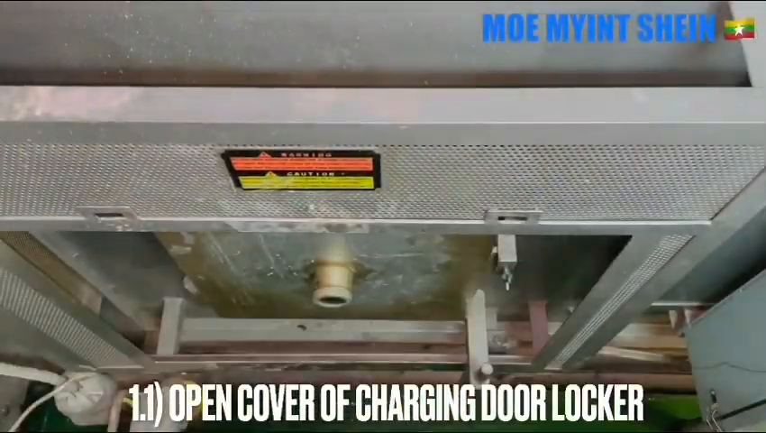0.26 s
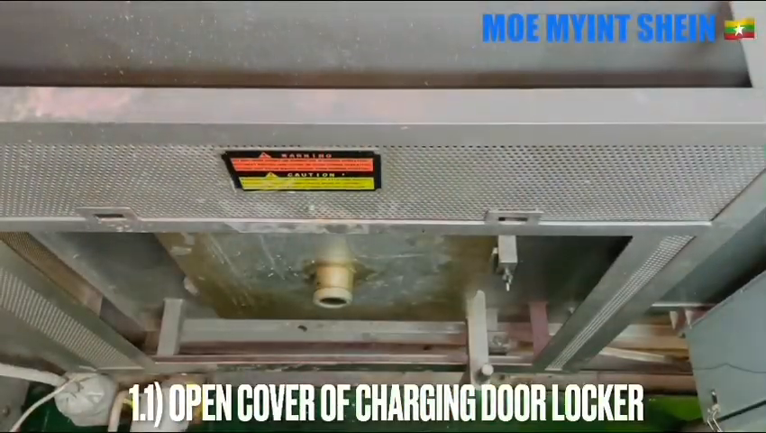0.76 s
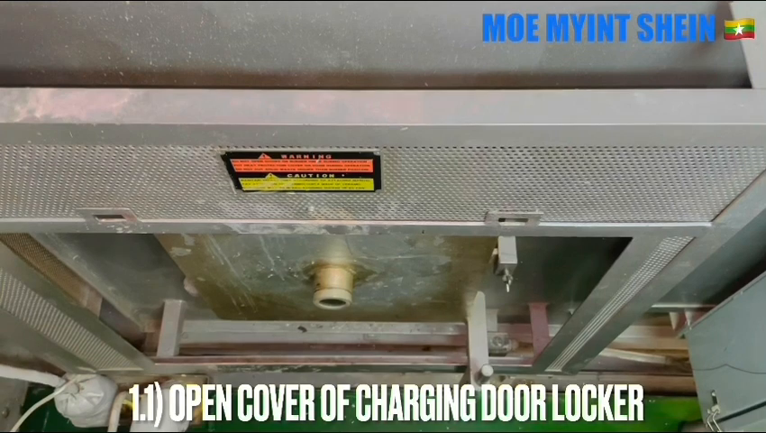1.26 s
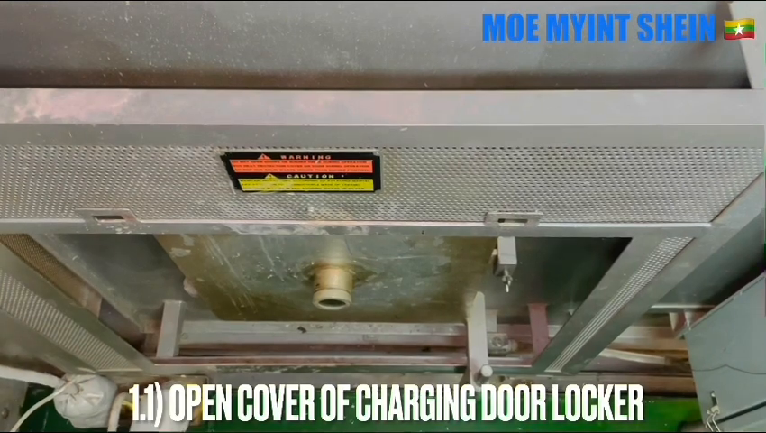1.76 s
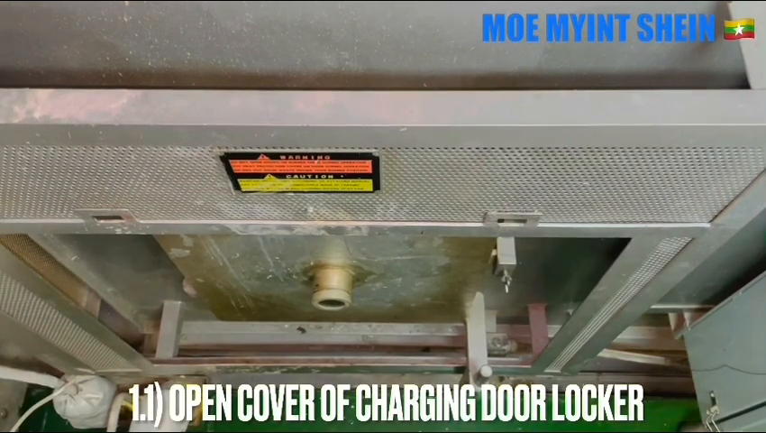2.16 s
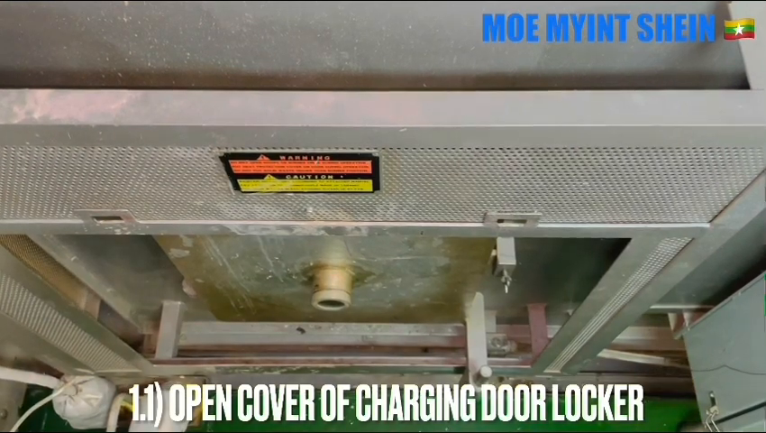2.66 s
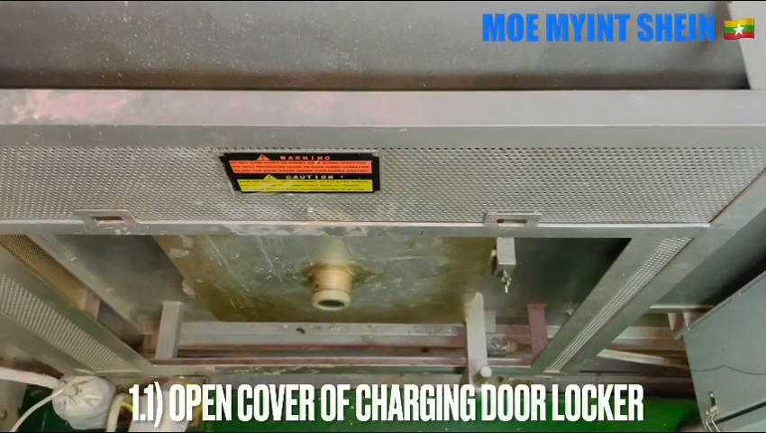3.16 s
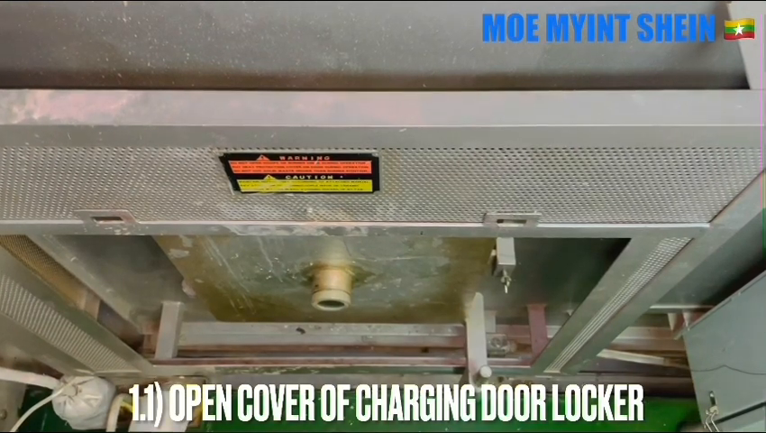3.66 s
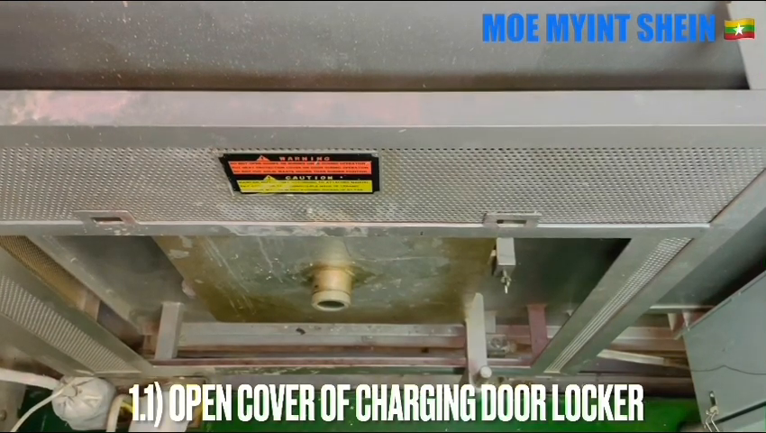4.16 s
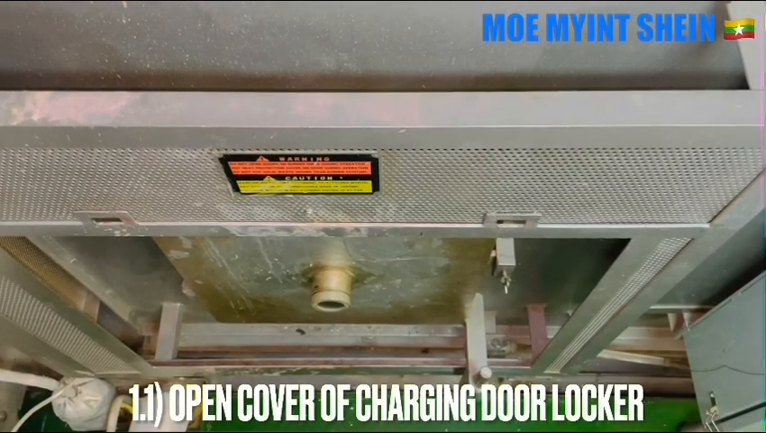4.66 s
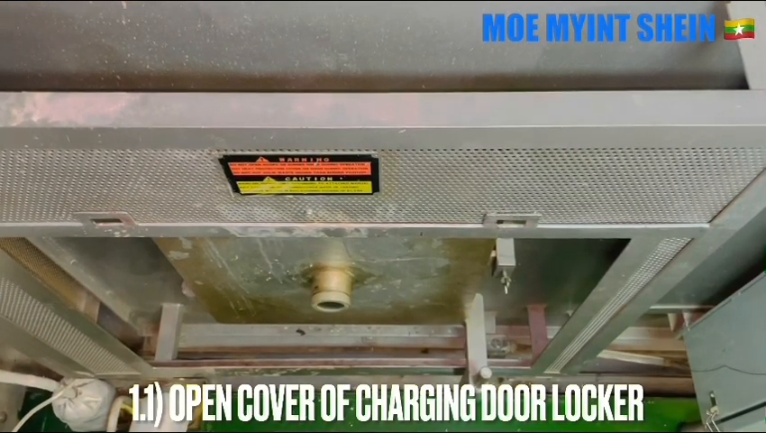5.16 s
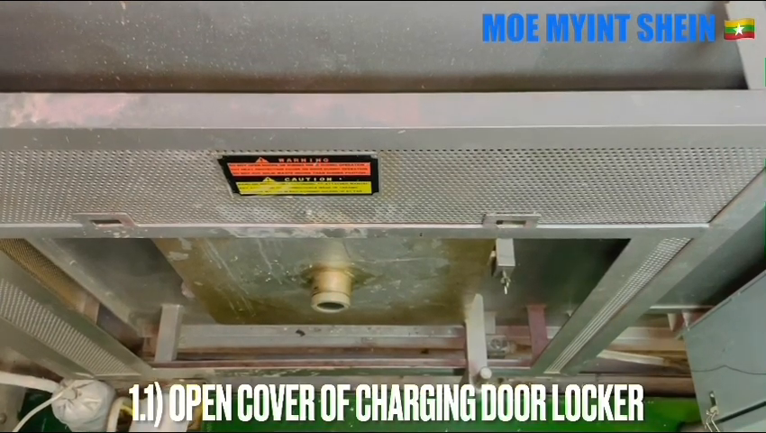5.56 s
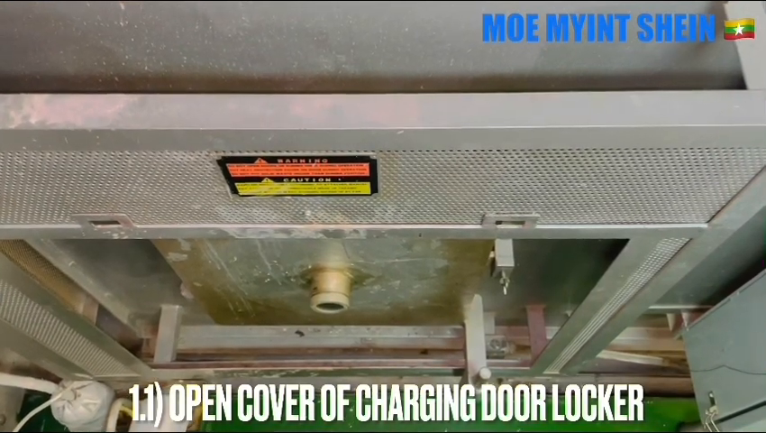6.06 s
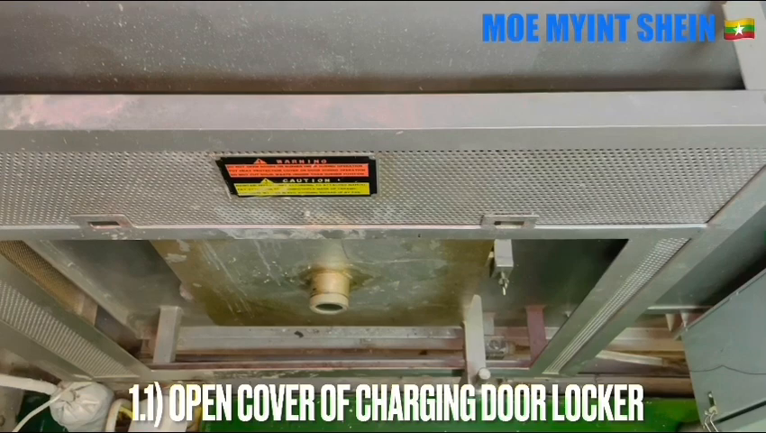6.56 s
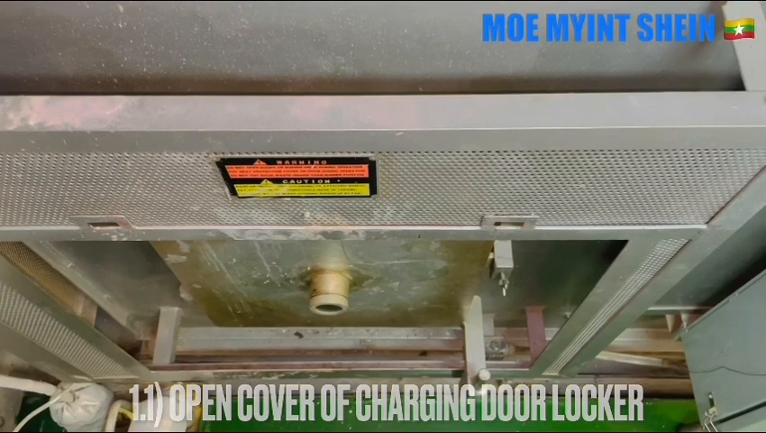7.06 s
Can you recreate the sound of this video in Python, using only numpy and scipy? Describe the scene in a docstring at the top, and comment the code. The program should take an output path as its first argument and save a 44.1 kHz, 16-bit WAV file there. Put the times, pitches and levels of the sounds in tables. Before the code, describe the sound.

A diesel generator throbs steadily in a ship's engine room, with a deep rumble from the deck plates. Other machines hum, pumps whine softly, fans rush and air hisses thinly. Near the start a small hard part ticks faintly and something scuffs briefly. Later come two faint, thin, high squeaks, the second right at the end. The sound is mono and the machinery never lets up.

```python
"""A diesel generator throbs in a ship's engine room: six cylinders, four-stroke, about 900 rpm.
Hull and deck plates rumble, other machines hum, pumps and gears whine, fans roar and beat, air hisses.
Faintly over this, a small hard part ticks, something scuffs by catching and slipping, and later come
two thin high squeaks: the first arcs up and down, the second rises at the very end. Mono."""
import sys
import numpy as np
from scipy.fft import rfft, irfft, next_fast_len
from scipy.io import wavfile
from scipy.ndimage import map_coordinates

SR = 44100
rng = np.random.default_rng(int(sys.argv[2]) if len(sys.argv) > 2 else 0)


def store_wav(level_fs):
    """Save 16-bit WAV to argv[1]."""
    pcm = np.round(np.clip(np.atleast_2d(level_fs), -1, 1) * 32767)
    wavfile.write(sys.argv[1], SR, pcm.T.astype(np.int16))


N = 322736

CYCLE_HZ = 7.517  # one four-stroke cycle, two crankshaft turns
FAN_SPLIT_HZ, TOP_HZ = 830, 15740

# Generator tones. Each row: multiple of the cycle rate (6 is the firing rate), relative level in dB.
GENERATOR_ORDERS = [(6, -40.9), (7, -50.0), (9, -54.1), (10, -44.2), (12, -46.3), (14, -40.4), (15, -51.4),
                    (18, -54.7), (21, -64.0), (25, -60.9), (48, -69.8), (64, -69.2)]
# Machine tones. Each row: frequency in Hz, relative level in dB.
MACHINE_HUMS = [(24.73, -54.4), (37.08, -48.2), (42.55, -52.6), (49.4, -53.0), (59.67, -48.0),
                (70.05, -52.7), (79.67, -52.4), (82.53, -52.1), (92.53, -53.2), (99.08, -46.3),
                (118.9, -54.1), (175.38, -57.2), (418.1, -67.8)]
PUMP_GEAR_WHINES = [(706.8, -79.1), (744.2, -78.9), (986.0, -68.3), (1057.5, -73.0), (1082.5, -81.8),
                    (1090.0, -74.2), (1232.8, -76.0), (1530.2, -80.5), (1546.5, -81.1), (1766.0, -79.0),
                    (1804.0, -83.9), (2412.0, -92.0), (2546.0, -89.0), (2662.5, -91.3), (2905.0, -84.6),
                    (3511.8, -94.0), (5470.5, -96.1), (7574.0, -101.0)]
FAN_BLADE_TONES = [(806.7, -78.5), (809.3, -76.0), (811.8, -73.5), (817.0, -83.0), (819.3, -83.0),
                   (824.0, -82.0), (850.8, -81.0), (852.0, -74.8)]
# Noise spectra. Each row: frequency in Hz, relative spectral density in dB.
PLATE_SPECTRUM = [(14, -36), (25, -16.5), (45, -2), (64, -9), (76, -6.5), (93, -3.5), (108, -16), (125, -9),
                  (161, -21), (175, -9.5), (187, -20), (199, -13), (210, -25), (260, -75)]
ROAR_SPECTRUM = [(150, -27), (205, -3.5), (235, 1), (335, 0.5), (400, -3), (425, -6), (445, -10),
                 (530, -12.5), (620, -22.5), (900, -39), (2000, -90)]
VENT_SPECTRUM = [(300, -19), (580, -0.5), (740, 3), (920, 0), (1300, 0), (1820, -2.5), (2020, -10),
                 (2880, -9), (3300, -16.5), (3500, -13), (3750, -19), (4400, -27), (9000, -59)]
HISS_SPECTRUM = [(1500, -9), (4000, 1.5), (5200, 3), (7000, 0), (9000, -1.5), (10400, -8.5), (11300, -4.5),
                 (12600, -0.5), (15600, -8)]
GUST_SPECTRUM = [(2000, -25), (5000, -1), (8500, -3.5), (10400, -8), (12600, 0.5), (15600, -3)]
CRACK_SPECTRUM = [(2000, -25), (4000, 0), (11500, -1), (15000, -9)]
SCUFF_SPECTRUM = [(800, -16), (1220, 0), (1420, 5), (1780, 4), (2050, -11.5), (2400, 2), (2560, 1.5),
                  (2900, -16), (3300, -8), (4000, -22), (4500, -17), (5200, -25), (8000, -28), (12000, -40)]
# Swells of the deep rumble and the lower fan tones. Each row: centre in seconds, half width in seconds,
# added power in dB relative to the steady sound.
DEEP_SWELLS = [(1.65, 0.8, 3), (5.8, 1, -1)]
FAN_SWELLS = [(1.43, 0.092, 4.5), (3.05, 0.54, 4.5)]
# Noise bursts. Each row: centre in seconds, half width in seconds, relative level in dB.
HISS_GUSTS = [(.97, .1, -74), (1.3, .08, -78), (1.83, 0.067, -78), (2.41, .08, -76), (2.785, .016, -71),
              (3.56, .06, -78), (3.77, 0.045, -75), (4.34, .08, -77.5), (4.5, .03, -74),
              (5.94, .022, -73.5), (6.55, .018, -74)]
SCUFF_STROKES = [(.369, 0.012, -54.5), (.401, 0.009, -51), (.428, 0.032, -58.5)]
# Modes of the small hard part. Each row: frequency in Hz, relative level in dB, T60 in seconds.
PART_MODES = [(4150, -6, 0.013), (5400, -9, .012), (6300, -6, .013), (7300, -7, .013), (8500, -12, .01),
              (10500, -8, .011), (11900, -10, .009)]
# Squeak arcs. Each row: time of the top in seconds, nominal top pitch in Hz, base level in dB,
# bend in log pitch per second squared, drop in log pitch at which it stalls.
SQUEAK_ARCS = [(5.045, 8780, -78, 21, .16), (7.325, 12900, -63, 49, .3)]
# Squeak partials. Each row: ratio to the pitch, relative level at the top in dB, multiple of the fade.
FIRST_SQUEAK_PARTIALS = [(1, 0, 0.6), (1.247, 2.5, 9), (1.38, -4.5, 5)]
SECOND_SQUEAK_PARTIALS = [(0.99, 0, 0.9), (.92, 0, 4), (.46, -16, 0.6)]


def amp(db):
    """Decibels to gain."""
    return 10 ** (np.asarray(db) / 20)


def time_s():
    """Time of each sample."""
    return np.arange(N) / SR


def wobble(knots_per_s):
    """Smooth random curve, rms near 1."""
    knots = rng.standard_normal(4096)
    grid_s = np.linspace(0, N / SR, num=8192)
    return np.interp(time_s(), grid_s, map_coordinates(knots, [grid_s * knots_per_s], mode="wrap"))


def filtered(x, gain_at_hz):
    """Zero-phase FFT filter."""
    size = next_fast_len(N + SR // 2)
    return irfft(rfft(x, size) * gain_at_hz(np.fft.rfftfreq(size, 1 / SR)), size)[:N]


def noise(spectrum):
    """Noise of rms 1, spectrum interpolated over log frequency."""
    points_hz, points_db = np.transpose(spectrum)
    white = rng.standard_normal(N)
    x = filtered(white, lambda hz: amp(np.interp(np.log(hz + 1), np.log(points_hz + 1), points_db)))
    return x / np.sqrt(np.mean(x ** 2) + 1e-20)


def tone(turns):
    """Sine of rms 1, random start phase."""
    return np.sqrt(2) * np.sin(2 * np.pi * (turns + rng.random()))


def bumps(rows):
    """Envelope of bell curves, summed in power."""
    t = time_s()
    power = sum(amp(db) ** 2 * np.exp(-np.minimum(((t - centre_s) / half_width_s) ** 2, 100))
                for centre_s, half_width_s, db in rows)
    return np.sqrt(power)


def swell_gain(rows):
    """Unity gain plus swells, summed in power."""
    return np.sqrt(1 + bumps(rows) ** 2)


def generator(hunt_cycles, waver_db):
    """All orders ride on one crankshaft, its speed held almost steady by the governor."""
    cycles = CYCLE_HZ * time_s() + hunt_cycles * wobble(1)
    return sum(amp(db + waver_db * wobble(1.94)) * tone(order * cycles) for order, db in GENERATOR_ORDERS)


def hull(rumble_db, roar_db, throb_depth):
    """Plates rumble under the machines; the roar above throbs at the firing rate."""
    firing = tone(6 * CYCLE_HZ * time_s())
    rumble = amp(rumble_db) * noise(PLATE_SPECTRUM)
    roar = amp(roar_db + 0.4 * wobble(5)) * (1 + throb_depth * firing) * noise(ROAR_SPECTRUM)
    return rumble + roar


def shaft_tones(rows, gain_db, drift_turns, waver_db):
    """Tones of separate shafts, each drifting in phase and wavering in level."""
    t = time_s()
    return sum(amp(gain_db + db + waver_db * wobble(2.97)) * tone(hz * t + drift_turns * wobble(2.063))
               for hz, db in rows)


def deep_swell(x, corner_hz, steady_db):
    """The band below the corner swells slowly; the rest holds steady."""
    deep = filtered(x, lambda hz: 1 / (1 + (hz / corner_hz) ** 8))
    return x - deep + deep * amp(steady_db) * swell_gain(DEEP_SWELLS)


def fans(air_db, tone_gain_db, drift_turns, waver_db):
    """Air rushes; fans at nearly equal speeds beat in two tone clusters. The lower swells twice."""
    lower_rows = [(hz, db) for hz, db in FAN_BLADE_TONES if hz < FAN_SPLIT_HZ]
    upper_rows = [(hz, db) for hz, db in FAN_BLADE_TONES if hz >= FAN_SPLIT_HZ]
    lower = shaft_tones(lower_rows, tone_gain_db, drift_turns, waver_db)
    upper = shaft_tones(upper_rows, tone_gain_db, drift_turns, waver_db)
    rush = amp(air_db + 0.46 * wobble(7.2)) * noise(VENT_SPECTRUM)
    return swell_gain(FAN_SWELLS) * lower + upper + rush


def hiss(steady_db, gust_gain_db):
    """Thin steady air hiss with brief bright gusts."""
    steady = amp(steady_db) * noise(HISS_SPECTRUM)
    gusts = amp(gust_gain_db) * bumps(HISS_GUSTS) * noise(GUST_SPECTRUM)
    return steady + gusts


def tick(start_s, ring_db, crack_db, crack_t60_s):
    """One light contact on a hard part: a tiny crack and short, high modes."""
    age_s = np.clip(time_s() - start_s, 0, 0.1)
    ring = sum(amp(db - 60 * age_s / t60_s) * np.sin(2 * np.pi * hz * age_s)
               for hz, db, t60_s in PART_MODES)
    crack = (age_s > 0) * amp(-60 * age_s / crack_t60_s) * noise(CRACK_SPECTRUM)
    return amp(ring_db) * ring + amp(crack_db) * crack


def scuff(grain_db):
    """Something rubs briefly, catching and slipping."""
    return amp(grain_db * wobble(205)) * bumps(SCUFF_STROKES) * noise(SCUFF_SPECTRUM)


def squeak(arc, partials, flutter_db, rasp_depth, fade_db=53):
    """Thin squeak on a pitch arc, loudest at the top; uneven slips roughen the pitch."""
    top_s, top_hz, base_db, bend_per_s2, stall_sag = arc
    sag = np.minimum(bend_per_s2 * (time_s() - top_s) ** 2, 10)  # natural-log pitch drop
    pitch_hz = top_hz * np.exp(-sag) * (1 + rasp_depth * wobble(1500))
    turns = np.cumsum(pitch_hz) / SR
    stall_gate = 1 / (1 + (sag / stall_sag) ** 6)
    voice = sum(amp(db - fade_multiple * fade_db * sag + flutter_db * wobble(60)) * tone(ratio * turns)
                for ratio, db, fade_multiple in partials)
    return amp(base_db) * stall_gate * voice


def scene():
    """All machines run throughout, with the small sounds on top."""
    engine = generator(hunt_cycles=0.0052, waver_db=0.96)
    engine += hull(rumble_db=-36, roar_db=-51, throb_depth=0.029)
    hums = shaft_tones(MACHINE_HUMS, gain_db=1, drift_turns=0.039, waver_db=1)
    machines = deep_swell(engine + hums, corner_hz=61, steady_db=-1.5)
    whines = shaft_tones(PUMP_GEAR_WHINES, gain_db=0.04, drift_turns=0.069, waver_db=1.5)
    air = fans(air_db=-60, tone_gain_db=-2, drift_turns=0.054, waver_db=1.3)
    air += hiss(steady_db=-73.5, gust_gain_db=1)
    small = tick(start_s=0.0899, ring_db=-52, crack_db=-55, crack_t60_s=0.014)
    small += scuff(grain_db=1.1)
    small += squeak(SQUEAK_ARCS[0], FIRST_SQUEAK_PARTIALS, flutter_db=3.5, rasp_depth=0.013)
    small += squeak(SQUEAK_ARCS[1], SECOND_SQUEAK_PARTIALS, flutter_db=3, rasp_depth=0.011)
    return (machines + whines + air + small)[None]


def record(dry):
    """Brick-wall low-pass at TOP_HZ."""
    return filtered(dry[0], lambda hz: hz < TOP_HZ)[None]


dry = scene()
out = record(dry)
store_wav(out)
```